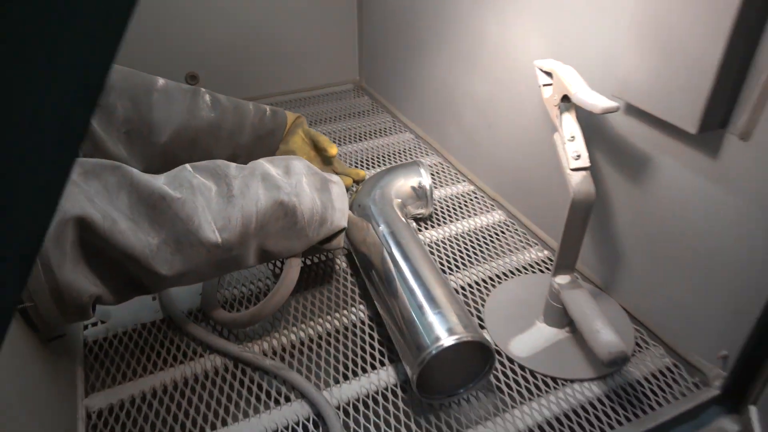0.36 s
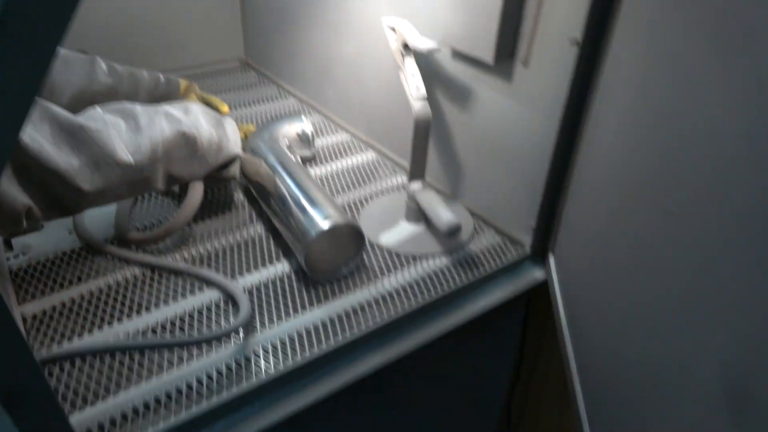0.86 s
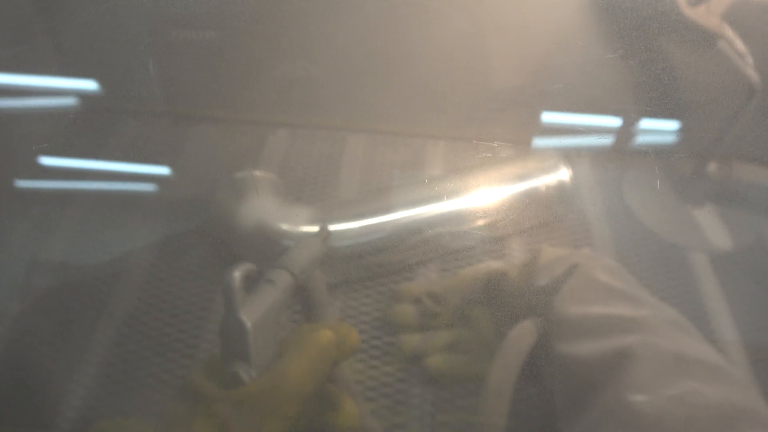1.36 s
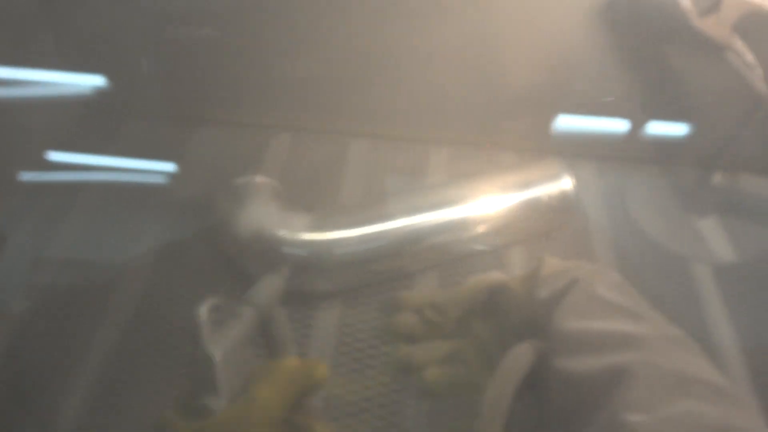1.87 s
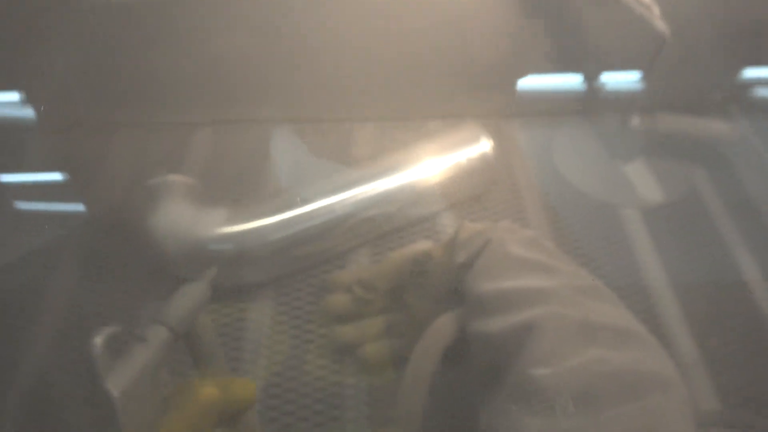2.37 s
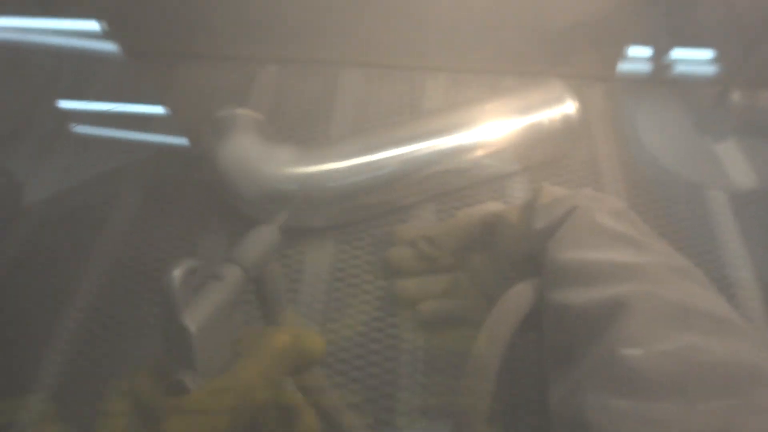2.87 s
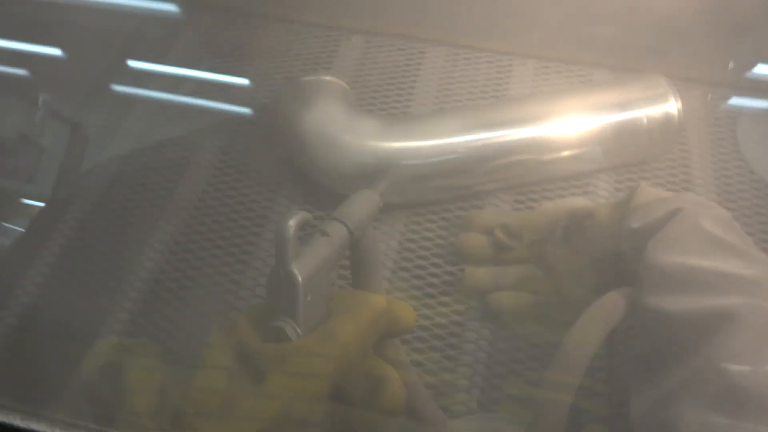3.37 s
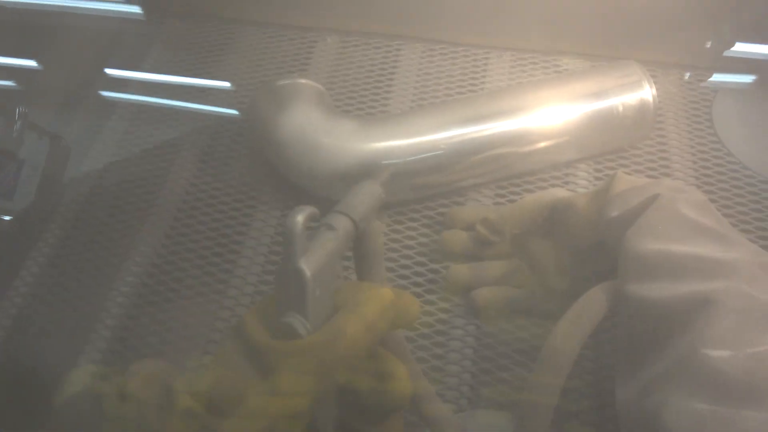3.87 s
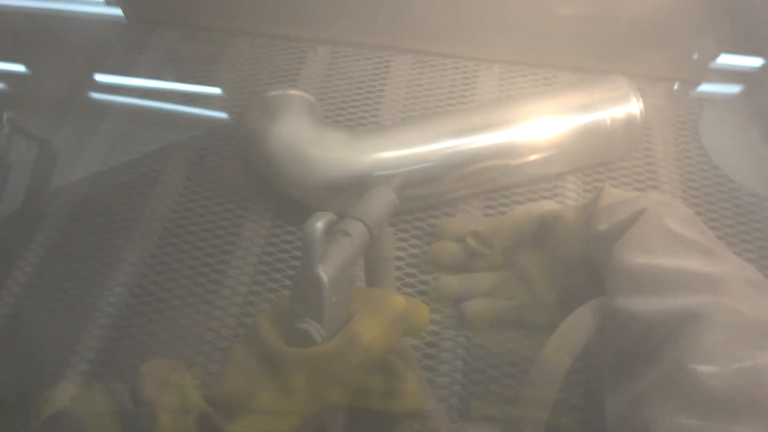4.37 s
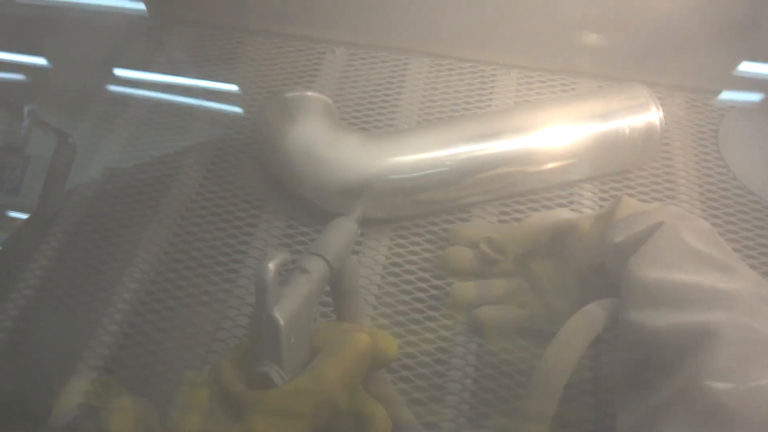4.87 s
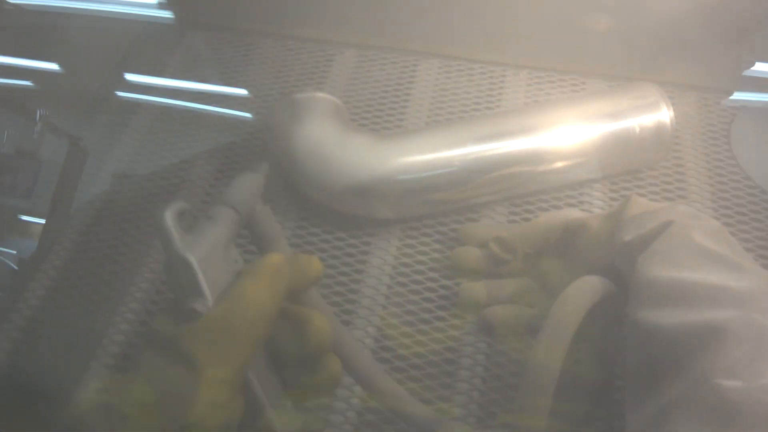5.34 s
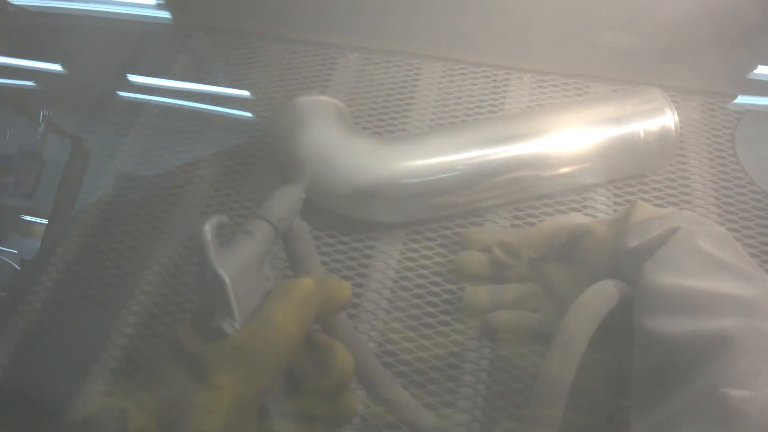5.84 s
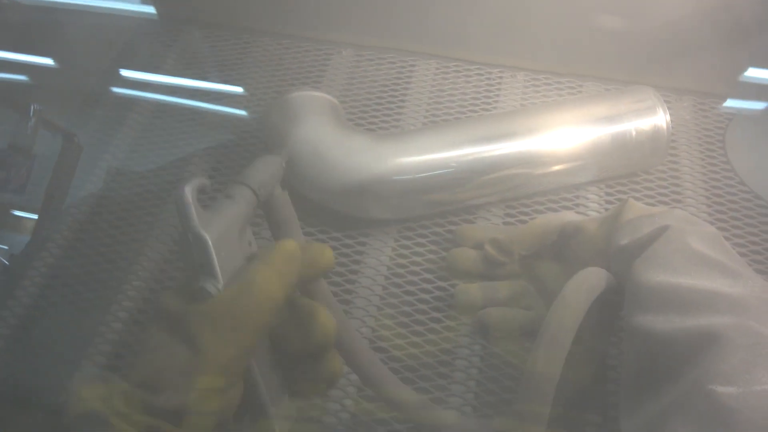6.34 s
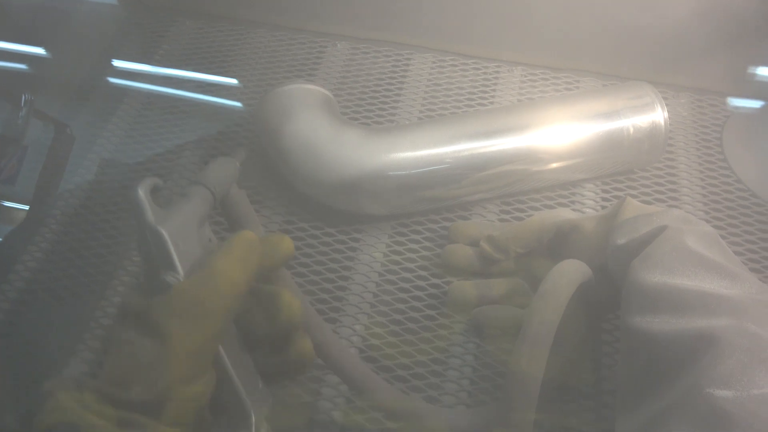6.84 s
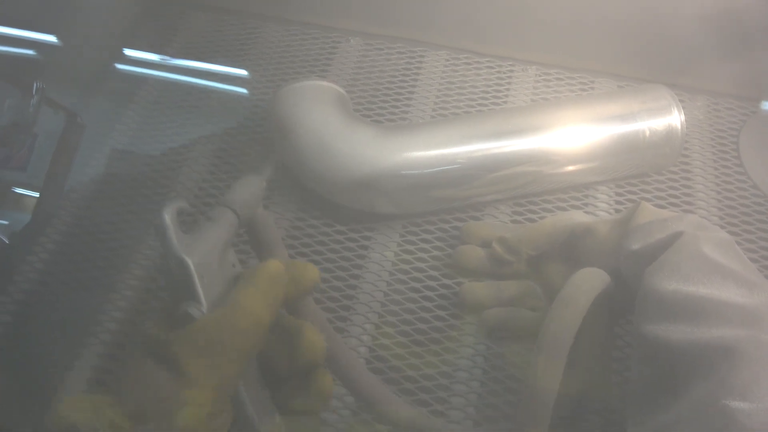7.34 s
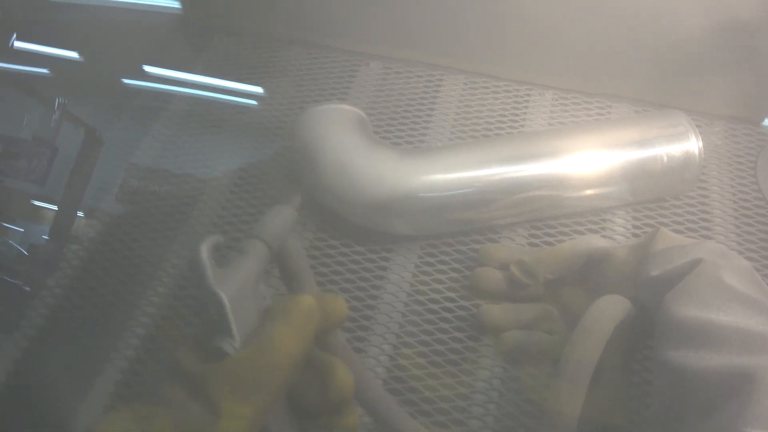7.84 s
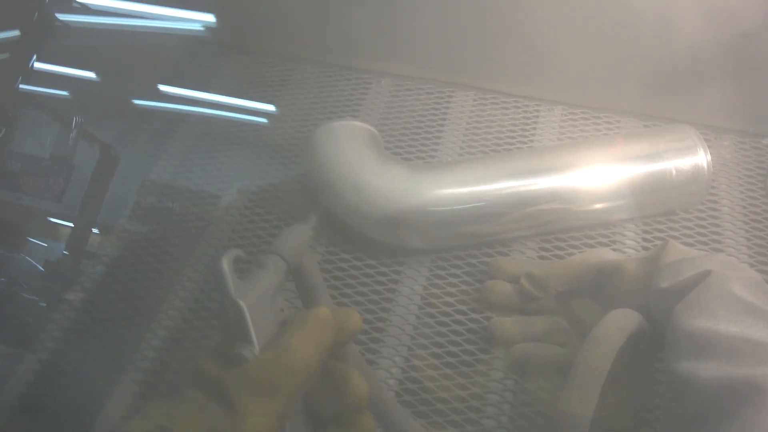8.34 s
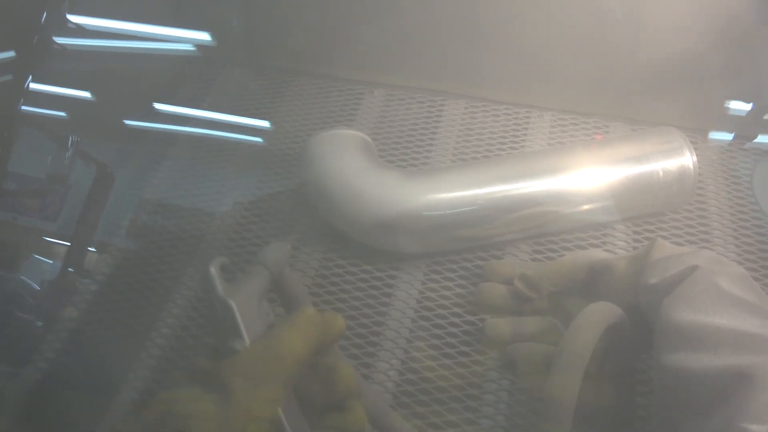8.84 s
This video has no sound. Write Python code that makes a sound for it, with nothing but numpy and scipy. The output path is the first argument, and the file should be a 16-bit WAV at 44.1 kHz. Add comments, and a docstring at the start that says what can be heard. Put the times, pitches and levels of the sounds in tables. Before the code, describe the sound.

In a quiet workshop, heavy sleeves and gloves rustle, scuff and tick against a metal grate and pipe. After about a second a compressed-air jet cuts in, loud and harsh. Plain air first, then grit joins with a dense fine patter. The hiss continues to the end, with shifting hollow roar and metallic ring from the pipe, in a small steel cabinet, heard closely in modest stereo.

```python
"""In a workshop, a blasting gun works over a metal pipe inside a closed steel cabinet. First the shop is quiet:
room tone, faint machines, gloves and sleeves rustling, scuffing and ticking. Then the scene changes to the jet
blowing, plain air at first, then air with grit; noise in bands makes its hiss, roar and ring. Random impulses
make the grit patter, resonated noise the booming cabinet air, random echoes its walls."""
import sys
import numpy as np
from scipy import signal
from scipy.fft import rfft, irfft
from scipy.io import wavfile

SR = 44100
rng = np.random.default_rng(int(sys.argv[2]) if len(sys.argv) > 2 else 0)


def voltage_ratio(decibels):
    """Convert decibels (scalar or array-like) to amplitude ratios, 20 dB per decade."""
    exponent = np.asarray(decibels, float) / 20
    return 10 ** exponent


def wrap_up_sound(samples):
    """Save the sound to the file named by the first command line argument, as 16-bit audio."""
    columns = np.atleast_2d(samples).T
    # keep every value between -1 and 1, then stretch to whole-number steps
    tamed = np.clip(columns, -1, 1)
    steps = np.round(tamed * 32767).astype(np.int16)
    wavfile.write(sys.argv[1], SR, steps)


N = 395136

# Spectrum of the quiet room. Each row: frequency in Hz, relative density in dB per Hz.
ROOM_SPECTRUM = [(18, -36), (30, -9), (108, 1), (156, -11), (292, 1.5), (577, -2.5), (711, 0), (900, -9),
                 (1000, -5.5), (6080, -33), (15600, -33)]
# Machines idling far off. Each row: frequency in Hz, nominal level in dB rms.
SHOP_TONES = [(107.7, -63), (188.4, -64), (242.2, -66), (296.1, -67), (721.4, -66)]
# Strokes of the sleeves. Each row: start in seconds, hold in seconds, rustle, scuff and low bump in dB.
STROKES = [(0, 0.097, -54, -55.5, -50), (.13, 0.066, -60, -60, -58), (0.267, 0.037, -57, -47, -50),
           (.5, .015, -63, -64, -53), (0.617, 0.075, -56, -51.5, -55), (.72, 0.075, -60.5, -53, -53),
           (0.907, .03, -66, -53, -55)]
# Spectrum of rustling cloth. Each row: frequency in Hz, relative density in dB per Hz.
RUSTLE_SPECTRUM = [(2000, -7), (3000, 0), (6000, -4.5), (10000, -8), (15700, -16)]
# Spectra of scuff and bump. Each row: frequency in Hz, relative density in dB per Hz.
SCUFF_SPECTRUM = [(600, 2), (2400, -7)]
BUMP_SPECTRUM = [(35, 0), (65, -1), (350, -6)]
# Gloves touch grate and pipe. Each row: start in seconds, ring in dB, ring frequency in Hz,
# ring decay by 60 dB in seconds, relative crack level in dB, crack centre in Hz.
TICKS = [(.005, -38, 58, .35, -60, 600), (0.2824, -38, 640, .1, -33.5, 1200),
         (.319, -48, 900, .04, -43, 1800), (.4845, -34, 700, 0.048, -29.5, 1490),
         (.506, -38, 330, 0.14, -52, 3000), (.5787, -33, 8700, 0.013, -29, 2300),
         (.604, -40, 560, .06, -48, 2600), (.625, -32, 1330, 0.043, -58, 2600),
         (.7254, -42, 1400, .03, -36, 1200)]
# Modes of the pipe. Each row: frequency in Hz, bandwidth in Hz, relative level in dB.
PIPE_MODES = [(470, 110, -7), (584, 20, -6), (675, 31, -4), (828, 5.9, -6), (970, 30, -7), (1100, 13, 0),
              (1480, 180, -8), (1840, 50, -11), (2400, 79, -7.5), (3026, 66, -11.5)]
# How squarely the jet meets the pipe. Each row: time in seconds, bore roar in dB, wall ring in dB.
PIPE_LEVELS = [(0.95, -26.5, -29.5), (1.28, -32.5, -27.5), (1.53, -31.5, -27.5), (1.59, -33, -31),
               (1.66, -27.5, -27), (1.71, -30.5, -25.5), (2.58, -39, -26), (2.71, -31, -25.5),
               (3.31, -32, -26), (3.38, -33.5, -31), (3.67, -29, -27.5), (3.8, -33, -29), (3.89, -28, -24),
               (4.47, -36.5, -32.5), (4.92, -36.5, -34.5), (5.14, -33.5, -28), (5.95, -34.5, -26),
               (6.44, -39.5, -33.5), (6.68, -26, -26.5), (6.79, -32.5, -32.5), (7.22, -29.5, -30),
               (7.51, -35.5, -32.5), (7.98, -34, -31), (8.22, -24.5, -23.5), (8.4, -23.5, -25),
               (8.62, -30.5, -26.5), (8.94, -33.5, -24.5), (8.96, -30, -26)]
# Hiss of the jet. Each row: time in seconds, level in dB.
HISS_LEVEL = [(0.95, -21.5), (1.55, -20), (1.59, -23.5), (1.98, -22), (2.02, -23), (2.11, -22),
              (2.69, -21.5), (4.87, -22), (5.3, -20.5), (5.41, -22.5), (5.84, -20.5), (6.77, -22.5),
              (6.84, -21), (7.98, -24), (8.85, -21), (8.96, -21)]
# Air modes of the cabinet. Each row: frequency in Hz, nominal bandwidth in Hz, relative level in dB.
CABINET_MODES = [(193.4, 11, -15), (265.7, 18.6, 1), (307.2, 20, -0.5), (350, 18.4, -1.5), (387.7, 30, -8)]
# Boom of the cabinet air as the gun sweeps. Each row: time in seconds, level in dB.
BOOM_LEVEL = [(0.95, -19), (1.1, -28), (1.15, -22), (1.86, -44.5), (1.91, -31.5), (2.31, -41.5),
              (2.38, -32.5), (2.49, -41), (2.62, -29), (2.71, -41), (2.91, -30.5), (3.45, -36.5),
              (3.54, -27), (3.65, -34), (4.29, -30.5), (4.36, -41.5), (4.65, -30), (4.72, -38),
              (5.08, -25.5), (5.14, -35.5), (5.54, -30), (5.97, -43), (6.03, -35), (7.93, -34.5),
              (8.18, -32.5), (8.96, -36)]
# Rumble. Each row: time in seconds, level in dB.
RUMBLE_LEVEL = [(0.95, -40), (1.22, -43), (1.55, -37), (1.62, -46.5), (1.98, -54.5), (3.92, -46),
                (5.66, -51), (5.72, -61), (5.86, -50), (7.84, -54), (8.04, -46.5), (8.96, -52)]
# Spectrum of the rumble. Each row: frequency in Hz, relative density in dB per Hz.
RUMBLE_SPECTRUM = [(25, -15), (60, -14.5), (100, -7.5), (140, -6.5), (180, 0), (225, -5.5)]
# The jet lingers on a spot and one resonance swells. Each row: start in seconds, end in seconds,
# frequency in Hz, nominal bandwidth in Hz, level in dB rms before the fades.
SWELLS = [(0.897, 1.65, 5120, 600, -28), (.9, 1.65, 3900, 700, -35), (.9, 1.62, 533, 200, -31.5),
          (1.597, 1.967, 1870, 500, -27), (1.996, 2.599, 2040, 300, -31), (2.0, 2.196, 6440, 1500, -22),
          (2.153, 2.579, 6130, 900, -26.5), (2.447, 2.856, 2960, 120, -33.5), (2.7, 3.3, 1420, 300, -36.5),
          (3.845, 4.248, 1370, 350, -36.5), (5.1, 5.354, 3100, 500, -30.5), (6.757, 7.3, 4450, 1100, -27),
          (8.14, 8.551, 790, 242, -29.5), (8.45, 8.855, 780, 200, -32.5), (8.173, 8.325, 2400, 70, -30),
          (8.547, 9.0, 4600, 130, -30.5), (8.75, 9.0, 1920, 350, -29)]
# Treble of plain air. Each row: frequency in Hz, relative density in dB per Hz.
AIR_SPECTRUM = [(7400, -19), (8200, 2.5), (9500, -2), (11300, -6), (12300, -6), (13700, 1), (14800, -3),
                (15800, -10)]
# Treble of air with grit. Each row: frequency in Hz, relative density in dB per Hz.
GRIT_SPECTRUM = [(7400, -17), (8200, -5.5), (10000, -6), (12000, -7), (14000, -12), (15800, -14.5)]
# Patter of the grit. Each row: time in seconds, level in dB, lift of the highest treble in dB.
PATTER_LEVELS = [(.95, -26, 2), (1.55, -20, 3), (1.6, -28, 9), (2.0, -25, 2.5), (2.3, -25.5, -0.5),
                 (2.62, -25.5, 3), (2.76, -25, 0), (3.4, -23.5, 0.5), (4.9, -21.5, -0.5), (5.05, -24.5, 0),
                 (5.5, -23.5, 2.5), (5.88, -23.5, -3), (6.0, -23, -0.5), (6.55, -24, 2.5), (6.9, -24, 0.5),
                 (7.9, -24, 3.5), (8.38, -24.5, -1), (8.96, -24, 0)]
# A low hum. Each row: frequency in Hz, nominal level in dB rms.
HUM_TONES = [(44, -57.5), (89, -59.5)]
# Stereo width of the blast before its spread moves. Each row: frequency in Hz, side over mid in dB.
BLAST_WIDTH = [(30, -17), (80, -2), (200, -22.5), (700, -18), (1500, -26.5), (5200, -17), (5900, -9),
               (9000, -7), (12500, -9), (14000, -8), (15500, -17)]
# Stereo width of the quiet shop. Each row: frequency in Hz, side over mid in dB.
SHOP_WIDTH = [(60, -23), (700, -17), (2400, -13), (4400, -12), (7000, -3), (15000, -5)]
# Patchiness of the stereo side, band by band. Each row: band centre in Hz, spread in dB.
SIDE_PATCHINESS = [(700, 2.8), (1400, 3.2), (7000, 1.6), (9500, 1.7), (12000, 1.2), (14500, 1.6)]

BLAST_ON_S, GRIT_ARRIVES_S = 0.934, 1.572
TIME = np.arange(N) / SR
FREQ = np.fft.rfftfreq(N, 1 / SR) + 1e-3  # kept above zero for the logarithm


def rms_one(x):
    """Normalisation: scales a signal to unit rms."""
    return x / np.sqrt(np.mean(x ** 2) + 1e-20)


def in_time(rows):
    """Linear interpolation: gives the columns of a timed table at every sample."""
    s, *columns = np.transpose(rows)
    return [np.interp(TIME, s, column) for column in columns]


def colour(x, points, skirt_db=18.0):
    """Spectral shaping: weights x by a curve that falls beyond its ends by skirt_db an octave."""
    hz, level_db = np.transpose(points)
    octaves_beyond = np.maximum(np.log2(hz[0] / FREQ), 0) + np.maximum(np.log2(FREQ / hz[-1]), 0)
    gain_db = np.interp(np.log(FREQ), np.log(hz), level_db) - skirt_db * octaves_beyond
    return irfft(rfft(x) * voltage_ratio(gain_db), N)


def noise():
    """White noise: equal power at every frequency."""
    return rng.standard_normal(N)


def drift(rate_hz):
    """Low-passed chance: a slow random fluctuation with rms 1."""
    steps_per_s = 40
    steps = rng.standard_normal(int(N / SR * steps_per_s) + 2)
    r = np.exp(-2 * np.pi * rate_hz / steps_per_s)
    slow = signal.filtfilt([1 - r], [1, -r], steps)
    return np.interp(TIME * steps_per_s, np.arange(len(slow)), rms_one(slow))


def resonance(x, hz, width_hz):
    """Damped resonance: a two-pole band-pass with near-unit gain at its peak."""
    r = np.exp(-np.pi * width_hz / SR)
    poles = [1, -2 * r * np.cos(2 * np.pi * hz / SR), r * r]
    return signal.lfilter([(1 - r * r) / 2, 0, (r * r - 1) / 2], poles, x)


def twice_resonant(x, hz, width_hz):
    """Cascaded resonance: two equal stages narrow the peak and steepen its skirts."""
    return resonance(resonance(x, hz, width_hz), hz, width_hz)


def grains(per_s, count):
    """Random impacts: dense impulses of uneven size and random sign."""
    sizes = voltage_ratio(3.1 * np.minimum(rng.exponential(1, (count, N)), 5))
    signs = rng.choice([-1, 1], (count, N))
    return sizes * signs * (rng.random((count, N)) < per_s / SR)


def wavering(hz, db):
    """Modulated sine: a low tone whose pitch and level wander."""
    phase = 2 * np.pi * np.cumsum(hz + 2.0 * drift(2.6)) / SR
    return voltage_ratio(db + 3.5 + 3.1 * drift(5.5)) * np.sin(phase)


def room_tone():
    """Stationary noise and distant tones: the shop at rest."""
    return voltage_ratio(-52) * rms_one(colour(noise(), ROOM_SPECTRUM)) + sum(wavering(hz, db) for hz, db in SHOP_TONES)


def sleeve_levels():
    """Stroke envelopes: rustle, scuff and bump each rise, hold and fall back to rest, in dB."""
    # each triple: rustle, scuff, bump
    rise_db_per_s, fall_db_per_s, rest_db = (180, 450, 400), (130, 350, 250), (-65, -66, -62)
    t = TIME[::32]
    levels = np.transpose([rest_db]) + 0 * t
    for start, hold, *db in STROKES:
        before = np.outer(rise_db_per_s, np.maximum(start - t, 0))
        after = np.outer(fall_db_per_s, np.maximum(t - start - hold, 0))
        levels = np.maximum(levels, np.transpose([db]) - before - after)
    return [np.interp(TIME, t, level) for level in levels]


def sleeves():
    """Friction noise: many tiny impacts make rustle and scuff, low noise makes the bumps."""
    rustle_db, scuff_db, bump_db = sleeve_levels()
    fibres = grains(per_s=9900.0, count=2)
    rustle = voltage_ratio(rustle_db) * rms_one(colour(fibres[0], RUSTLE_SPECTRUM))
    scuff = voltage_ratio(scuff_db) * rms_one(colour(fibres[1], SCUFF_SPECTRUM))
    bump = voltage_ratio(bump_db) * rms_one(colour(noise(), BUMP_SPECTRUM))
    return rustle + scuff + bump


def ticks():
    """Impact: a decaying ring, a broad crack, and a bright snap that grows with the blow."""
    out, t = np.zeros(N), np.arange(SR // 5) / SR
    for s, db, hz, t60, crack_db, crack_hz in TICKS:
        burst = rng.standard_normal(len(t))
        build = 1 - np.exp(-t / (0.028 * t60))
        ring = voltage_ratio(db - 60 * t / t60) * build * np.sin(2 * np.pi * hz * t)
        body = rms_one(twice_resonant(burst, crack_hz, crack_hz))
        # the same burst reversed serves as a second noise
        bright = signal.lfilter([0.6], [1, -0.4], burst[::-1])
        snap = voltage_ratio(crack_db + 30.5) * bright * voltage_ratio(-60 * t / 0.025)
        crack = voltage_ratio(crack_db - 5.5 - 60 * t / 0.034) * (body + snap)
        start = round(s * SR)
        out[start:start + len(t)] += ring + crack
    return out


def workshop():
    """Superposition: room tone, moving sleeves and ticks add up."""
    return room_tone() + sleeves() + ticks()


def sliced(x, low_hz, high_hz, shape_db, patchy_db, count=6):
    """Sub-band modulation: slices of two noises move and flicker in level while their sum stays even."""
    edges, out, power = np.geomspace(low_hz, high_hz, count + 1), 0, 0
    for k, (low, high) in enumerate(zip(edges, edges[1:])):
        gain = voltage_ratio(shape_db(np.sqrt(low * high)) + patchy_db * drift(4.3))
        band = signal.butter(2, [low, high], "band", fs=SR, output="sos")
        out = out + gain * signal.sosfilt(band, x[k % 2])
        power = power + gain ** 2 * (high - low)
    return rms_one(out / np.sqrt(power))


def leaning(low_hz, high_hz, lower_db):
    """Spectral tilt: a slope giving the lower half, in octaves, the stated share of the power."""
    share, ratio = np.clip(voltage_ratio(2 * lower_db), 0.05, 0.95), np.sqrt(high_hz / low_hz)
    step_db = 10 * np.log10((1 - share) / share / ratio)
    return lambda hz: step_db * np.log(hz / low_hz) / np.log(ratio)


def wall_swing():
    """Relative level: how far the wall's ring stands above its mean, in dB."""
    wall_db = in_time(PIPE_LEVELS)[1]
    return wall_db - wall_db.mean()


def pipe_noise(air):
    """Modal excitation: the pipe's modes stand out of the broad noise that drives them."""
    modes = sum(voltage_ratio(db) * resonance(air, hz, width) for hz, width, db in PIPE_MODES)
    return air + voltage_ratio(-3.0) * modes


def bore_roar(pipe):
    """Resonance of the bore: the louder it roars, the more it gathers around its centre."""
    centre_hz, spread_octaves = 800, 0.26
    roar_db = in_time(PIPE_LEVELS)[0]
    focus_db = 6.5 + 0.51 * (roar_db - roar_db.mean())

    def peak(hz):
        return focus_db * np.exp(-(np.log2(hz / centre_hz) / spread_octaves) ** 2 / 2)
    return voltage_ratio(roar_db + 0.36 * drift(15.0)) * sliced(pipe, 422, 1222, peak, patchy_db=0.1)


def wall_ring(pipe):
    """Wall vibration: its lower half gains a larger share as the roar outdoes the ring."""
    roar_db, wall_db = in_time(PIPE_LEVELS)
    lead_db = roar_db - wall_db - np.mean(roar_db - wall_db)
    tilt = leaning(1210, 3370, -5.5 + 0.21 * lead_db)
    return voltage_ratio(wall_db + 0.78 * drift(4.2)) * sliced(pipe, 1262, 3220, tilt, patchy_db=0.7)


def jet_hiss(air):
    """Turbulent noise: its lower half gains a larger share as the wall rings louder."""
    hiss_db, = in_time(HISS_LEVEL)
    tilt = leaning(3200, 8100, -4 + 0.18 * wall_swing())
    return voltage_ratio(hiss_db + 0.29 * drift(9.7)) * sliced(air, 3200, 7860, tilt, patchy_db=0.9)


def cabinet_boom():
    """Cavity modes: noise resonates in the enclosed air, swelling and sinking."""
    boom_db, = in_time(BOOM_LEVEL)
    # two stages, each 1.5 times as wide, come close to the nominal bandwidth
    boom = sum(voltage_ratio(db) * twice_resonant(noise(), hz, 1.5 * width) for hz, width, db in CABINET_MODES)
    return voltage_ratio(boom_db + 1.63 * drift(7.3)) * rms_one(boom)


def rumble():
    """Low-frequency noise: its level follows a curve and drifts slowly."""
    level_db, = in_time(RUMBLE_LEVEL)
    return voltage_ratio(level_db + 0.99 * drift(1.7)) * rms_one(colour(noise(), RUMBLE_SPECTRUM))


def swells():
    """Selective resonance: each band of noise comes quickly and fades more slowly."""
    rise, fall = 0.11, 0.27  # shares of a swell's length
    out = np.zeros(N)
    for start, end, hz, width, db in SWELLS:
        a, b = round(start * SR), min(round(end * SR), N)
        band = twice_resonant(rng.standard_normal(SR), hz, 1.44 * width)
        share = np.linspace(0, 1, b - a)
        envelope = np.clip(np.minimum(share / rise, (1 - share) / fall), 0, 1)
        out[a:b] += voltage_ratio(db) * rms_one(band)[a - b:] * envelope
    return out


def treble(air):
    """Impact noise: shaped air alone at first, then dense grit impacts with a moving top."""
    patter_db, lift_db = in_time(PATTER_LEVELS)
    gritty = np.clip((TIME - GRIT_ARRIVES_S) / 0.0091, 0, 1)
    plain = voltage_ratio(-26) * rms_one(colour(air[0], AIR_SPECTRUM))
    patter = voltage_ratio(patter_db) * rms_one(colour(grains(per_s=23000.0, count=1)[0], GRIT_SPECTRUM))
    top = (1 - gritty) * plain + gritty * patter
    top = top + (voltage_ratio(lift_db) - 1) * resonance(top, 13200, 5000)
    return voltage_ratio(0.68 * drift(6.9)) * top


def choke():
    """Flow obstruction: the jet dips as the grit arrives, holds, then recovers over the second half."""
    length_s, depth_db = 0.045, -2.5
    since = (TIME - GRIT_ARRIVES_S) / length_s
    return voltage_ratio(depth_db * (since > 0) * np.clip(2 - 2 * since, 0, 1))


def cabinet(x):
    """Reverberation: steel walls return decaying echoes, their pattern renewed as the gun moves."""
    gun_moves_s, t60_s, wet_share = 0.3, 0.16, 0.14  # share of the power
    hop, out = int(gun_moves_s * SR), np.zeros(N + SR * 3)
    tail, padded = np.arange(SR // 4) / SR, np.pad(x, (hop, 2 * hop))
    for start in range(0, N + hop, hop):
        echo = rng.standard_normal(len(tail)) * voltage_ratio(-60 * tail / t60_s)
        # overlapping windows whose powers add up to one
        piece = np.sqrt(np.hanning(2 * hop)) * padded[start:start + 2 * hop]
        wet = signal.fftconvolve(piece, echo / np.linalg.norm(echo))
        out[start:start + len(wet)] += wet
    return np.sqrt(1 - wet_share) * x + np.sqrt(wet_share) * out[hop:hop + N]


def blast():
    """Excitation and response: jet, pipe and grit reverberate; boom and rumble join without echo."""
    air = rng.standard_normal((2, N))
    pipe = pipe_noise(air)
    near = choke() * (bore_roar(pipe) + wall_ring(pipe) + jet_hiss(air)) + treble(air)
    return cabinet(near + swells()) + cabinet_boom() + rumble()


def hum():
    """Periodic tones: two low wavering tones set in."""
    on = np.clip((TIME - 4.75) / 0.05, 0, 1)
    return on * sum(wavering(hz, db) for hz, db in HUM_TONES)


def heard():
    """Crossfade: the scene changes from the quiet shop to the blast within a few milliseconds; the hum adds to
    it."""
    on = np.clip((TIME - BLAST_ON_S) / 0.0068, 0, 1)
    return (1 - on) * workshop(), on * blast() + hum()


def blast_side(jet):
    """Stereo side: it opens, narrows as the wall rings louder, and is patchy in level."""
    opening_db = -6 * np.clip(1 - (TIME - BLAST_ON_S) / 0.2, 0, 1)
    spread_db = -0.3 - 0.3 * wall_swing() + 0.9 * drift(1.2) + opening_db
    wide = voltage_ratio(spread_db) * colour(jet, BLAST_WIDTH, skirt_db=0)
    for hz, patchy_db in SIDE_PATCHINESS:
        wide = wide + (voltage_ratio(patchy_db * drift(8.7)) - 1) * resonance(wide, hz, 0.34 * hz)
    return wide


def left_bass(mid):
    """Level difference: a side signal that gives the left more bass than the right."""
    left_over_right_db, below_hz = 2, 400
    balance = np.tanh(np.log(voltage_ratio(left_over_right_db)) / 2)
    return balance * signal.lfilter(*signal.butter(1, below_hz, fs=SR), mid)


def scene():
    """Mid and side: a fresh draw of the same sounds makes two close microphones differ."""
    mid = sum(heard())
    shop, jet = heard()
    side = blast_side(jet) + left_bass(mid)
    # the bass of the image is narrower while plain air blows
    plain = (TIME > BLAST_ON_S) & (TIME < GRIT_ARRIVES_S)
    side = side + plain * (voltage_ratio(-6) - 1) * signal.lfilter(*signal.butter(2, 1000, fs=SR), side)
    side = side + colour(shop, SHOP_WIDTH, skirt_db=0)
    return np.array([mid + side, mid - side])


def band_limit(x):
    """A steep low-pass at the top of the band."""
    return signal.sosfilt(signal.butter(12, 16270, fs=SR, output="sos"), x)


def record(dry):
    """Saturation and band limit: peaks are rounded towards full scale and the top is cut."""
    rounded = np.tanh(dry)
    low_pass = signal.ellip(10, 0.5, 50, 15800, fs=SR, output="sos")
    mix = signal.sosfilt(low_pass, rounded)
    return band_limit(mix)


dry = scene()
out = record(dry)
wrap_up_sound(out)
```